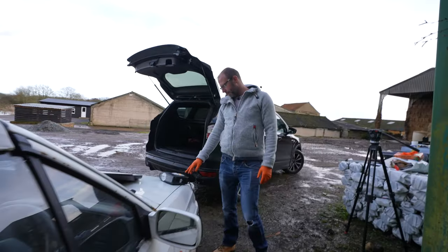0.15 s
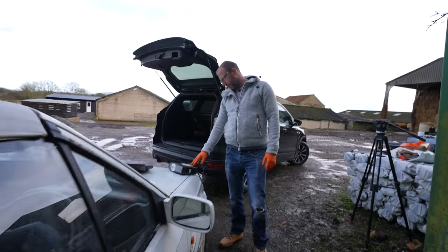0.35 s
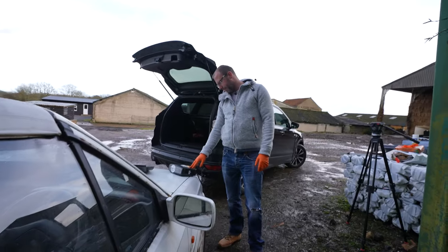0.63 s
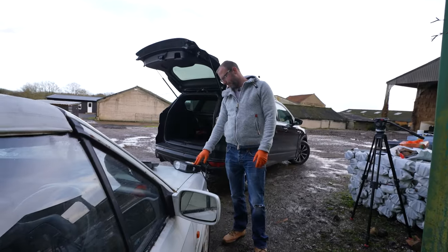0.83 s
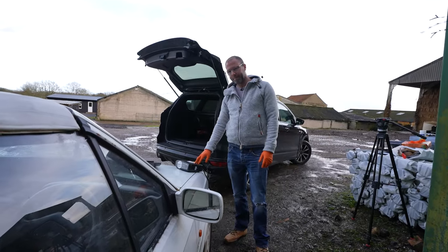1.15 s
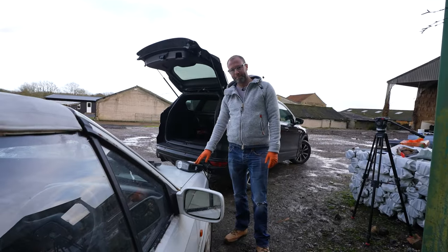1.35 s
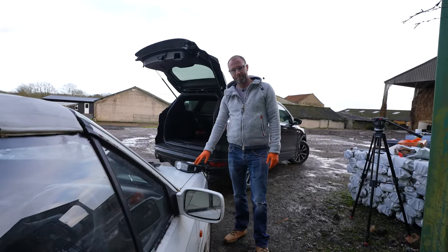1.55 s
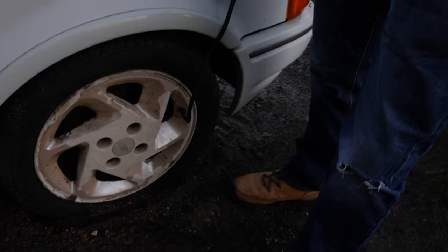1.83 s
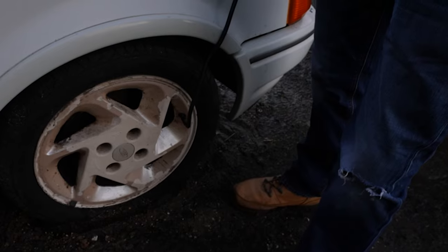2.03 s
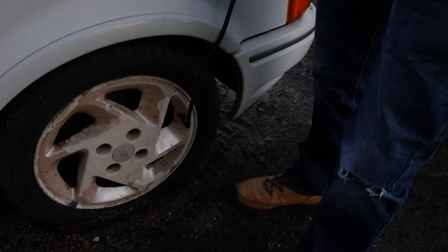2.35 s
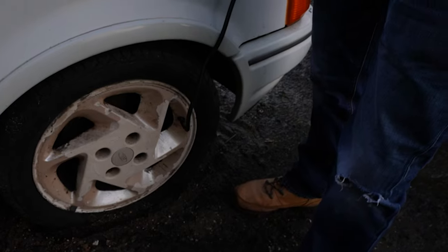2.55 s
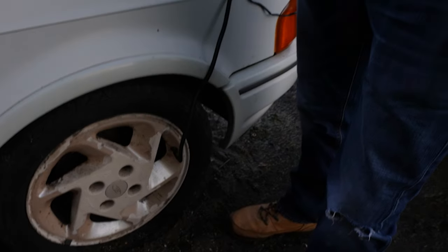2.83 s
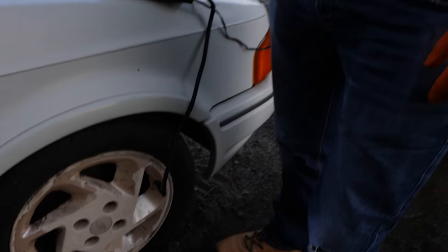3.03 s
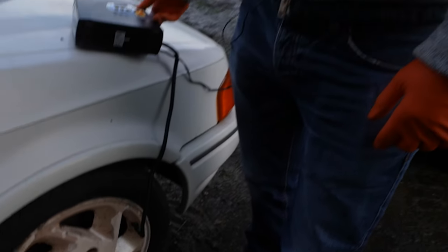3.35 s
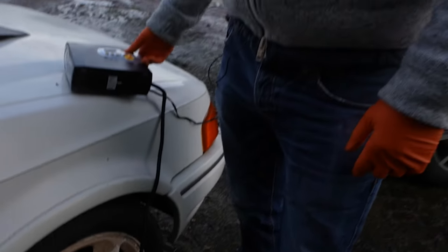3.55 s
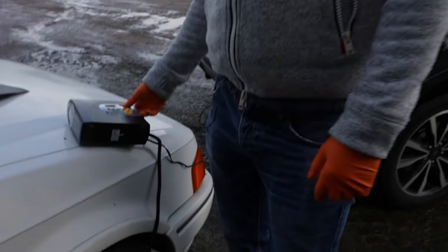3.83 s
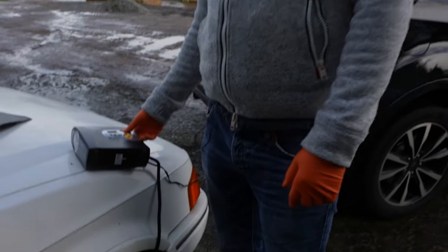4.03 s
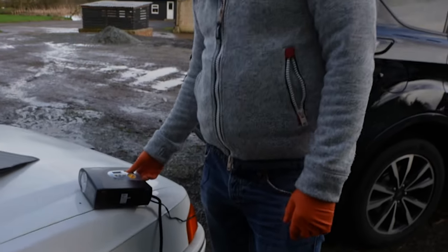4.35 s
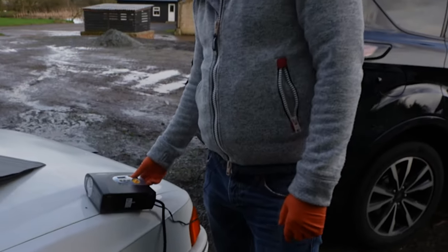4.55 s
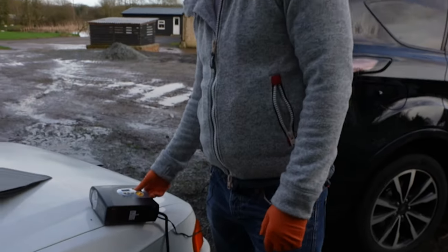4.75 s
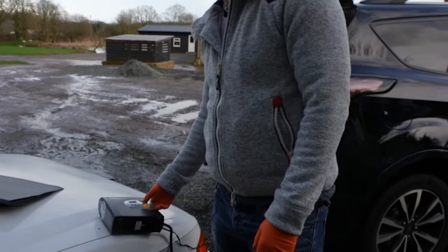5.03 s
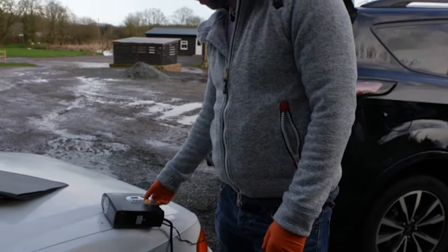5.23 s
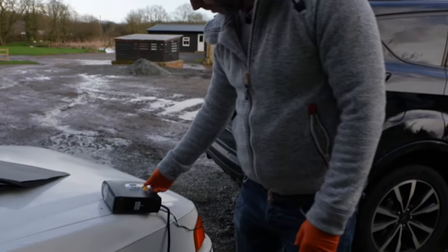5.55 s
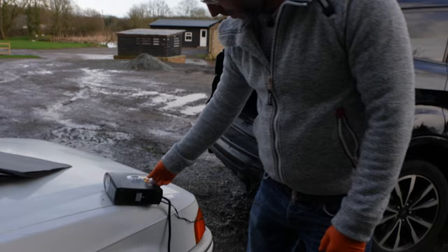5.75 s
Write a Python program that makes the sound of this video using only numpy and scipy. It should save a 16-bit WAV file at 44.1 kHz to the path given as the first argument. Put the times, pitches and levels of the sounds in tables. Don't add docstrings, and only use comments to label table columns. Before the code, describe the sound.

Rapid buzzing chug of a portable tyre pump outdoors, with gear whine and faint hiss, cut off near the end to reveal distant engine and traffic.

```python
import sys
import numpy as np
from scipy import signal
from scipy.fft import rfft, irfft
from scipy.io import wavfile
from scipy.ndimage import map_coordinates

SR = 44100
rng = np.random.default_rng(int(sys.argv[2]) if len(sys.argv) > 2 else 0)


def field_ratio(decibels):
    return 10 ** (np.asarray(decibels, dtype=float) / 20)


def generate_wav(signal):
    frames = np.transpose(np.atleast_2d(signal))
    scaled = np.clip(frames, -1, 1) * 32767
    pcm = np.round(scaled).astype(np.int16)
    wavfile.write(sys.argv[1], SR, pcm)


N = 259388
TIME = np.arange(N) / SR
CUT_S, SWITCH_OFF_S = 1.81, 5.49
LEFT_RIGHT = np.array([[.5], [-.5]])


def in_time(rows, t=TIME):
    s, *columns = np.transpose(rows)
    return [np.interp(t, s, column) for column in columns]


def ramp(start_s, length_s):
    return np.clip((TIME - start_s) / length_s, 0, 1)


def drift(rate_hz):
    coarse = TIME[::64]
    knots = rng.standard_normal(400)
    wander = map_coordinates(knots, [coarse * np.clip(rate_hz, .1, 60)], order=3)
    return np.interp(TIME, coarse, wander)


def rms_one(x):
    return x / np.sqrt(np.mean(x ** 2, axis=-1, keepdims=True) + 1e-20)


def resonate(x, hz, width_hz):
    r = np.exp(-np.pi * width_hz / SR)
    feedback = [1, -2 * r * np.cos(2 * np.pi * hz / SR), r * r]
    return signal.lfilter(np.array([1, 0, -1]) * (1 - r * r) / 2, feedback, x)


# start_s, burst_db, extra_left_path_ms
PLACE = [(0, -33.5, 3.7), (.3, -32.5, 3.89), (.7, -31.5, 4.01), (1.81, -33.5, 4.08), (1.811, -34, 2.07),
         (2.6, -34, 2.03), (3.3, -35.5, 2.05), (3.7, -35.5, 2.29), (4.1, -34, 2.65), (4.5, -35, 2.87),
         (5.3, -34.5, 3.26)]
# rattle_db, left_burst_db, left_rattle_db, path_ms at which these hold
VIEW_LEVELS = [
    (-39, -2, -17.5, 5.05),
    (-39.5, 1, -9.5, 2.1),
]


def levels():
    burst_shade_db_per_ms, rattle_shade_db_per_ms = -2, -5.5
    burst_loss_db_per_s, rattle_loss_db_per_s = 73, 192
    burst_db, path_ms = in_time(PLACE)
    view = (TIME > CUT_S).astype(int)
    rattle_db, left_burst_db, left_rattle_db, usual_ms = np.array(VIEW_LEVELS)[view].T
    burst_db = burst_db - burst_loss_db_per_s * np.maximum(TIME - SWITCH_OFF_S, 0)
    rattle_db = rattle_db - rattle_loss_db_per_s * np.maximum(TIME - 5.52, 0)
    left = np.array([[1], [0]])
    extra_ms = path_ms - usual_ms
    valve_open = 1 - ramp(5.55, 0.01)
    air_gain = field_ratio(burst_db + left * (left_burst_db + burst_shade_db_per_ms * extra_ms)) * valve_open
    case_gain = field_ratio(rattle_db + left * (left_rattle_db + rattle_shade_db_per_ms * extra_ms))
    return air_gain, case_gain


# start_s, speed_strokes_per_s
CRANK_SPEED = [
    (0, 39.06),
    (1.81, 38.91),
    (1.811, 36.9),
    (2.6, 37.045),
    (3.5, 37.01),
    (3.9, 37.035),
    (4.8, 36.99),
    (5.49, 37.26),
]


def crank():
    coast = 31 * np.exp(-np.maximum(TIME - SWITCH_OFF_S, 0) / .11)
    speed = np.where(TIME < SWITCH_OFF_S, in_time(CRANK_SPEED)[0], coast)
    start_strokes, cut_jump_strokes = .163, .059
    done = 1 + start_strokes + np.cumsum(speed) / SR + cut_jump_strokes * (TIME > CUT_S)
    late = TIME - in_time(PLACE)[1] / 1000
    left = np.interp(late, TIME, done) + np.minimum(late, 0) * speed[0]
    return np.array([left, done]), np.minimum(1 / speed, .06)


# first_crest_strokes, left_lead_ms, intake_delay_strokes, right_intake_db, left_intake_db
BURST_TIMING = [
    (0.124, 5.1, .62, -19, -14),
    (0.06, 3.63, .44, -15, -12),
]
# right_hz, right_phase_rad, right_db, left_hz, left_phase_rad, left_db
DUCT_MODES = [
    [(365.4, 0.16, 2.5, 371, 0.052, -5), (743, 1, 3, 735, 0.25, -14), (666, 1, -8, 688, 0.17, -10),
     (1110, 0.22, -30, 808, 0.16, -15.5)],
    [(342, 0.1, 1, 345.7, 0.62, -0.5), (721, 0.096, 0.5, 727, 0.44, -10), (637, 0.62, -7.5, 683, 2.3, -15),
     (760.5, 0.33, -7.5, 632, 0.97, -13)],
]
# right_early_ms, left_early_ms, right_top_ms, left_top_ms, right_sharpness, left_sharpness
PUFF_SWELL = [
    [(1, 0.5, 6, 8.5, 3, 2.5), (1.5, -0.5, 8, 9.5, 7, 5)],
    [(2, 1.5, 8.2, 9, 4, 4), (1.2, 0.3, 7.4, 7.8, 5, 3.5)],
]


def bursts(turns, period, view, uneven_db=1.0):
    crest, left_lead_ms, intake, right_intake_db, left_intake_db = BURST_TIMING[view]
    lead = np.array([[left_lead_ms], [3.2]]) / 1000
    puffs = [(0, 0), (intake, np.array([[left_intake_db], [right_intake_db]]))]
    chance = rng.standard_normal((220, len(DUCT_MODES[view]), 3))
    pitch = np.where(period > .029, .9, 1)
    out = 0
    for k, mode in enumerate(DUCT_MODES[view]):
        hz, phase, db = np.reshape(mode, (2, 3))[::-1].T[..., None]
        early_ms, top_ms, sharp = np.reshape(PUFF_SWELL[view][min(k, 1)], (3, 2))[:, ::-1, None]
        start = lead + early_ms / 1000
        for delay, puff_db in puffs[:1 + (k < 2)]:
            shifted = turns + 1 - crest - delay + start / period
            stroke, since = shifted.astype(int), shifted % 1 * period
            age = since * 1000 / top_ms * (1 + .04 * chance[stroke, k, 2])
            fade = np.minimum(8 * (1 - shifted % 1), 1)
            shape = (age * np.exp(1 - age)) ** sharp * fade
            wobble = hz / 5000 * chance[stroke, k, 1]
            gain = field_ratio(db + puff_db + uneven_db * chance[stroke, k, 0])
            out = out + shape * gain * np.cos(2 * np.pi * hz * pitch * (since - start) + phase + wobble)
    return 1.973 * out


# position_strokes, decay_ms, low_noise_db, high_noise_db, low_blow_db, high_blow_db
STROKE_KNOCKS = [
    (0, 2.6, -4, 4, 21, 17),
    (.36, 5, -3, -3, 9, 7),
    (.545, 3.8, 2, 3, 24, 14),
    (.66, 3, -6, 1, 8, 10),
    (.8, 6, -3, 0, 5, 10),
]
FIRST_KNOCK_SHIFT = [-.055, .03]


def shaking(turns, period, noise):
    chance = rng.standard_normal((220, len(STROKE_KNOCKS), 2))
    hush_db = -4.5 * np.exp(-((turns % 1 - .28) / .07) ** 2)
    noise = noise * field_ratio(hush_db)
    low = high = 0.62 * noise * np.minimum(0.029 / period, 1)
    for k, (position, ms, low_db, high_db, low_blow_db, high_blow_db) in enumerate(STROKE_KNOCKS):
        shifted = turns - position - (k == 0) * np.where(TIME < CUT_S, *FIRST_KNOCK_SHIFT)
        stroke = shifted.astype(int)
        late = shifted - 0.003 * (1 + np.tanh(chance[stroke, k, 1]))
        strength = field_ratio(1.8 * chance[:, k, 0])[stroke] * field_ratio([[-5], [0]])
        blow = strength * np.diff(np.floor(late), prepend=0) * (TIME > .001)
        burst = strength * np.exp(-(shifted % 1) * period * 1000 / ms) * noise
        low = low + field_ratio(low_db) * burst + field_ratio(low_blow_db) * blow
        high = high + field_ratio(high_db) * burst + field_ratio(high_blow_db) * blow
    finger_press = field_ratio(0.5 * ramp(5, 0.26))
    return low, high * finger_press


def ring_case(case, low, high):
    out = 0
    for k, (hz, width_hz, right_db, left_db) in enumerate(case):
        gain = field_ratio(np.array([[left_db], [right_db]]) + 1.04 * drift(2.99)[:low.shape[1]])
        drive = low if hz < 1600 else high
        ring = resonate(resonate(drive, hz, 3 * width_hz), hz, width_hz)
        out = out + (-1) ** k * gain * ring
    return rms_one(out)


# pitch_hz, width_hz, right_db, left_db
CASE_MODES = [
    [(453, 240, -4.5, -4.5), (730, 142, -1.5, 0), (1115, 158, 4, -4.5), (1408, 192, -6.5, -15),
     (1820, 430, -11, -14.5), (2529, 212, -7.5, -12.5), (3200, 306, -10, -26), (4200, 374, -13, -47),
     (5140, 520, -20.5, -23), (6320, 510, -31, -39), (7530, 500, -28, -29), (8540, 690, -36.5, -32),
     (10300, 3900, -38, -34.5), (14300, 3000, -54, -46)],
    [(322, 140, -13.5, -2), (714, 175, -1, 0.5), (1114, 121, 0.5, -5), (1421, 160, -9, -11.5),
     (1788, 130, -14.5, -21), (2223, 294, -12, -17.5), (3124, 506, -18.5, -15.5), (4180, 380, -17.5, -16.5),
     (5030, 710, -21.5, -26), (6040, 1460, -32.5, -23.5), (8210, 940, -36, -25.5), (9370, 3800, -50, -33.5),
     (11530, 750, -40, -26.5), (13200, 3300, -53, -32)],
]


def rattle(turns, period):
    source = rng.standard_normal(N) * field_ratio(0.74 * drift(55))
    late = np.interp(TIME - in_time(PLACE)[1] / 1000, TIME, source)
    share = np.where(TIME < CUT_S, .4, .45) * np.clip(4.6 - TIME, .2, 1)
    left = share * late + np.sqrt(1 - share ** 2) * rng.standard_normal(N)
    loose = np.array([left, source])
    teeth = rng.standard_normal(1160)[(turns % 1 * 1160).astype(int)]
    teeth_share = .42
    noise = teeth_share * teeth + np.sqrt(1 - teeth_share ** 2) * loose
    low, high = shaking(turns, period, noise)
    cut, run_in = int(CUT_S * SR), 2000
    first = ring_case(CASE_MODES[0], low[:, :cut], high[:, :cut])
    second = ring_case(CASE_MODES[1], low[:, cut - run_in:], high[:, cut - run_in:])
    return np.hstack([first, second[:, run_in:]])


# pitch_hz, width_hz, turn_db_per_ms of path
LID_MODES = [(2300, 400, 1), (3020, 280, 0), (1820, 460, -3.5), (7800, 900, 4)]
# pitch_hz, width_hz, level_db, start_s, end_s
BODY_SHADE = [
    (3500, 500, -7, 3.15, 3.55),
    (8000, 1200, -4, 3.2, 4.2),
    (2960, 360, 4, 4.35, 5.3),
    (5950, 3200, 2.5, 5.15, 5.6),
    (2230, 500, 2, 4.7, 5.2),
    (1760, 370, 4.5, 0.46, 0.83),
    (1220, 530, -3, 4.0, 5.1),
    (1110, 630, 2, 0.27, 0.76),
    (4200, 500, 2, 1.0, 1.8),
    (4200, 500, 2, 2.7, 3.4),
]


def turn_lid(case, rise_ms):
    case[0] += 1.0 * ramp(3.6, 0.44) * resonate(case[0], 1300, 500)
    turned = 0
    for hz, width_hz, db_per_ms in LID_MODES:
        gain = field_ratio(db_per_ms * np.minimum(rise_ms, .9)) - 1
        turned = turned + gain * resonate(case[1], hz, width_hz)
    case[1] += turned
    shaded = 0
    for hz, width_hz, db, start_s, end_s in BODY_SHADE:
        gain = field_ratio(db * ramp(start_s, 0.051) * (1 - ramp(end_s, 0.085))) - 1
        shaded = shaded + gain * resonate(case[1], hz, width_hz)
    case[1] += shaded
    return case


def whistle(turns):
    cover_s, cover_loss_db, uncover_db_per_s = 3.6, 34, 9
    covered_db = cover_loss_db - uncover_db_per_s * np.maximum(TIME - cover_s, 0)
    left_db = -59 - ramp(cover_s - .2, .3) * covered_db
    beam_db = 11 * np.exp(-((TIME - 3.4) / 0.41) ** 4)
    right_db = -73 + beam_db + 9 * ramp(5.4, .1)
    later = np.array([.03 + .07 * ramp(cover_s, .5), .08 + 0 * TIME])
    puff = np.exp(-((turns - later - .5) % 1 - .18) ** 2 / 0.055 ** 2) * field_ratio(.9 * drift(37))
    hiss = resonate(resonate(rng.standard_normal((2, N)), 11520, 330), 11520, 360)
    gain = field_ratio(np.array([left_db, right_db]) - 5.0)
    return rms_one(puff * hiss) * gain * (TIME > CUT_S) * (TIME < 5.6)


# offset_strokes, first_right_db, first_left_db, second_right_db, second_left_db
MESH_LINES = [
    (-3, -58, -60, -48, -52),
    (-2, -54, -58, -50, -47),
    (-1, -46, -54, -45, -42),
    (0, -35, -46, -43, -54),
    (1, -43, -54, -39, -54),
    (2, -44, -56, -45, -56),
    (3, -48, -58, -49, -58),
]


def motor(turns, period):
    mesh_per_stroke = 17.462
    lines = 0
    for step, right, left, right2, left2 in MESH_LINES:
        db = np.where(TIME < CUT_S, [[left], [right]], [[left2], [right2]])
        tone = np.sin(2 * np.pi * (mesh_per_stroke + step) * turns + step * step)
        lines = lines + field_ratio(db + 2.2 * drift(4.94)) * tone
    return lines * np.minimum(.027 / period, 1) ** 4


# stroke_rate_multiple, first_view_db, second_view_db
PANEL_THROB = [(1, -49.5, -51), (2, -48, -55.5), (3, -57, -53.5), (4, -73, -52.5), (5, -52.5, -54.5),
               (6, -52.5, -55.5), (7, -87, -52.5)]


def throb(turns):
    lines = 0
    for k, first_db, second_db in PANEL_THROB:
        db = np.where(TIME < CUT_S, first_db, second_db) + 2 * drift(4)
        lines = lines + field_ratio(db) * np.sin(2 * np.pi * k * turns + k * k)
    return lines * np.clip((5.56 - TIME) / 0.064, 0, 1) * field_ratio([[-1], [4]])


# start_s, pitch_hz, level_db, length_ms
PISTON_CATCHES = [
    (5.554, 1160, -32, 8.3),
    (5.570, 830, -30.5, 7),
    (5.581, 339, -32, 8.1),
    (5.587, 660, -33.5, 9.6),
    (5.602, 641, -35.5, 8),
    (5.618, 1390, -40, 6.6),
    (5.635, 1120, -41, 7),
    (5.640, 810, -39, 7.8),
    (5.691, 702, -36.5, 8.6),
    (5.710, 690, -45, 12),
]


def catches():
    rings = 0
    for start_s, hz, db, ms in PISTON_CATCHES:
        swell = np.exp(-((TIME - start_s) * 1000 / ms) ** 2)
        rings = rings + field_ratio(db) * swell * np.sin(2 * np.pi * hz * TIME + 1.4 * drift(60))
    return rings * field_ratio([[-12], [0]])


def pump():
    air_gain, case_gain = levels()
    turns, period = crank()
    cut = int(CUT_S * SR)
    first = bursts(turns[:, :cut], period[:cut], view=0)
    second = bursts(turns[:, cut:], period[cut:], view=1)
    air = np.hstack([first, second])
    rise_ms = (TIME > CUT_S) * (in_time(PLACE)[1] - VIEW_LEVELS[1][3])
    air[1] += (field_ratio(2 * rise_ms) - 1) * resonate(air[1], 330, 190)
    case = turn_lid(rattle(turns, period) * case_gain * field_ratio(9.5), rise_ms)
    return air * air_gain * field_ratio(6.0) + case + whistle(turns) + motor(turns, period) + throb(turns) + catches()


# start_s, peak_db, left_right_db, tail_ms
VALVE_TICKS = [
    (1.81, -40, -7, 1.5),
    (5.547, -33, -8, 6),
    (5.5674, -31, -12, 3),
    (5.5794, -32, -12, 3),
    (5.614, -37, -10, 6),
    (5.632, -43, -6, 6),
    (5.680, -35, -12, 6),
    (5.777, -47, -6, 3),
]


def ticks():
    envelope = np.zeros((2, N))
    for start_s, db, pan_db, ms in VALVE_TICKS:
        decay = np.exp(-np.maximum(TIME - start_s, 0) * 1000 / ms)
        envelope += field_ratio(db + pan_db * LEFT_RIGHT - 2) * (TIME >= start_s) * decay
    low_pass = signal.butter(3, 5500, fs=SR, output="sos")
    noise = signal.sosfilt(low_pass, envelope * rng.standard_normal((2, N)))
    stray = field_ratio([[-44], [-52]]) * np.exp(-((TIME - 1.746) / 0.0023) ** 2)
    switch = field_ratio([[-56], [-46]]) * np.exp(-((TIME - SWITCH_OFF_S) / 0.0021) ** 2)
    thin = (stray + switch) * resonate(rng.standard_normal(N), 13500, 4000)
    bright = resonate(noise, 4200, 1200) + resonate(noise, 2200, 700)
    return bright + 5 * resonate(noise, 1170, 120) + 4 * resonate(noise, 690, 70) + thin


# start_s, level_db, pitch_hz, length_ms
MIC_BUMPS = [
    (.365, -22, 186, 50),
    (.41, -33, 175, 35),
    (.472, -30, 75, 30),
    (.505, -32, 50, 30),
    (.572, -26, 60, 40),
]


def bumps():
    thuds = 0
    for start_s, db, hz, ms in MIC_BUMPS:
        since = TIME - start_s
        thuds = thuds + field_ratio(db) * np.exp(-(since * 3000 / ms) ** 2) * np.cos(2 * np.pi * hz * since)
    cloth = resonate(resonate(rng.standard_normal(N), 1200, 2500), 900, 2200)
    brush = field_ratio(-31 + 2.5 * drift(40)) * np.exp(-((TIME - .48) / .08) ** 2) * cloth
    return (thuds + brush) * field_ratio([[0], [-9]])


# start_s, firing_hz
ENGINE_SPEED = [
    (1.81, 52),
    (2.1, 49.1),
    (2.4, 48.2),
    (3.1, 47.4),
    (3.8, 46.83),
    (4.58, 50.3),
    (4.9, 51.4),
    (5.6, 53.06),
    (5.88, 54.5),
]
ORDER_LEAD = [1.4, 1.44, 3.74, 1.76]
# firing_multiple, start_s, end_s, level_db
ORDER_BOOMS = [
    (3, 1.81, 2.7, -52),
    (2, 2.2, 3.8, -50),
    (3, 3.12, 3.85, -43.5),
    (2, 3.88, 4.7, -42),
    (3, 3.95, 4.75, -44.5),
    (3, 4.75, 5.6, -51),
    (2, 4.9, 5.3, -48),
    (4, 4.92, 5.62, -42),
    (5, 4.55, 5.55, -55),
]
# start_s, level_db
EXHAUST_BEATS = [(5.611, -39), (5.632, -44), (5.654, -42), (5.672, -37.5), (5.709, -40), (5.73, -41),
                 (5.751, -41), (5.772, -38), (5.799, -38), (5.823, -36), (5.846, -40), (5.869, -39)]
# pitch_hz, level_db, decay_ms
PIPE_RINGS = [(310, 0, 9), (215, -4, 9), (450, -7, 6)]


def engine():
    hum_gain = field_ratio(-47.5 + 0.9 * drift(4.4)) * ramp(2.5, .2) * (1 - ramp(5.6, .1))
    hum = hum_gain * np.sin(2 * np.pi * 55.8 * TIME + .8 * LEFT_RIGHT)
    cycle = 2 * np.pi * np.cumsum(in_time(ENGINE_SPEED)[0]) / SR
    lines = 0
    for order, start_s, end_s, db in ORDER_BOOMS:
        order = round(order)
        gain = field_ratio(db + 3 + 1.5 * drift(6)) * ramp(start_s - .04, .08) * (1 - ramp(end_s - .04, .08))
        lines = lines + gain * np.sin(order * cycle + ORDER_LEAD[order - 2] * LEFT_RIGHT)
    heard = TIME + 0.00293 * LEFT_RIGHT
    tail, beats = TIME > 5.6, np.zeros((2, N))
    for start_s, db in EXHAUST_BEATS:
        age = np.maximum(heard[:, tail] - start_s, 0)
        for hz, ring_db, ms in PIPE_RINGS:
            shape = np.tanh(age / .003) * np.exp(-age * 1000 / ms)
            beats[:, tail] -= field_ratio(db + ring_db + 9) * shape * np.sin(2 * np.pi * hz * age)
    return lines + hum + beats


def coloured(colour, alike, lead_rad):
    common, own = rfft(rng.standard_normal(N)), rfft(rng.standard_normal((2, N)))
    shared = alike * common * np.exp(1j * LEFT_RIGHT * lead_rad)
    return rms_one(irfft(colour * (shared + np.sqrt(1 - alike ** 2) * own), N))


# pitch_hz, level_db per Hz
ROAD_COLOUR = [(25, -13), (90, -1.5), (200, 14.5), (320, 11.5), (470, 7), (650, -3.5), (1100, 2),
               (1700, -6), (2400, -14.5), (4300, -18), (6500, -24.5), (9000, -31), (15000, -35)]
# start_s (middle of the pass), level_db, width_s
ROAD_PASSES = [
    (.3, -48, 0.42),
    (3.6, -66, 0.28),
    (5.2, -49.5, 0.47),
]
# start_s, level_db
WIND_GUSTS = [(0, -59), (.3, -56), (.55, -42), (.9, -50.5), (1.5, -55), (1.85, -46), (2.4, -54),
              (2.8, -48.5), (3.4, -44), (3.9, -47), (4.3, -42.5), (5.1, -48), (5.45, -66), (5.88, -44)]


def yard():
    hz = np.maximum(np.arange(N // 2 + 1) * SR / N, 1)
    road = field_ratio(-47)
    for middle_s, db, width_s in ROAD_PASSES:
        road = road + field_ratio(db) * np.exp(-((TIME - middle_s) / width_s) ** 2)
    colour_hz, colour_db = np.transpose(ROAD_COLOUR)
    colour = field_ratio(np.interp(np.log(hz), np.log(colour_hz), colour_db))
    traffic = coloured(colour, 0.98 / (1 + hz / 2500), 1.0 + hz * 0.0071) * road * field_ratio(2 * drift(6))
    rumble = (hz / 35) ** 3 / (1 + (hz / 35) ** 3) / (1 + (hz / 85) ** 2.0)
    gust_db = in_time(WIND_GUSTS)[0] + 1.8 * drift(7.1) + np.array([[-1.5], [1.5]])
    return traffic + coloured(rumble, 0.87, 1.45) * field_ratio(gust_db)


def scene():
    return pump() + ticks() + bumps() + engine() + yard()


def band_limit(x):
    return signal.sosfilt(signal.butter(12, 15740, fs=SR, output="sos"), x)


def record(dry):
    return band_limit(dry)


dry = scene()
out = record(dry)
generate_wav(out)
```